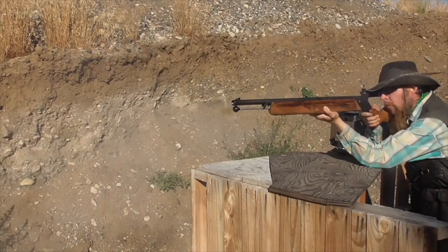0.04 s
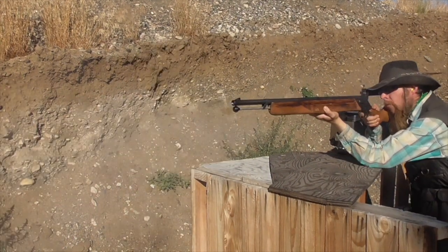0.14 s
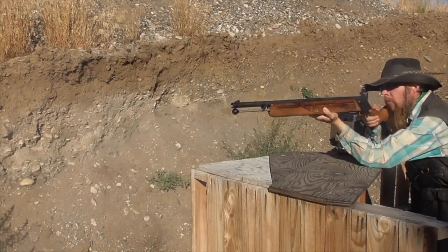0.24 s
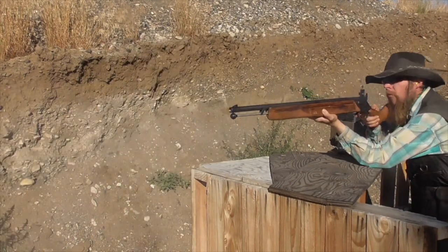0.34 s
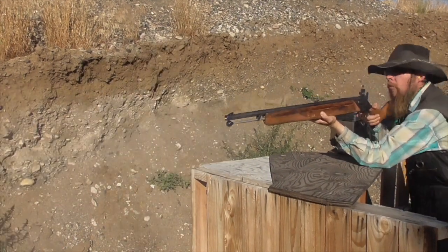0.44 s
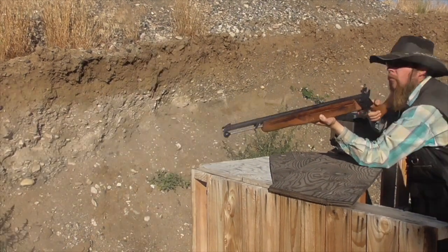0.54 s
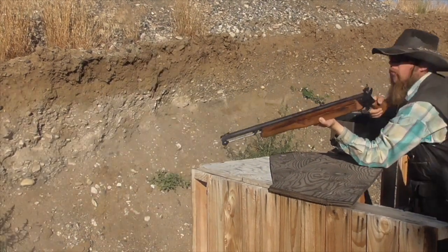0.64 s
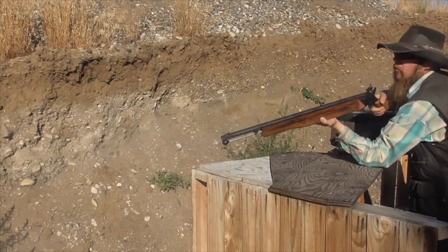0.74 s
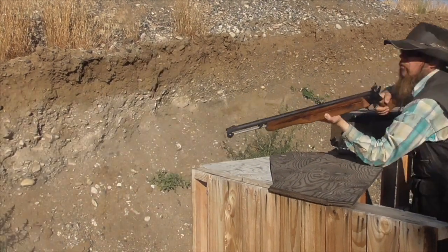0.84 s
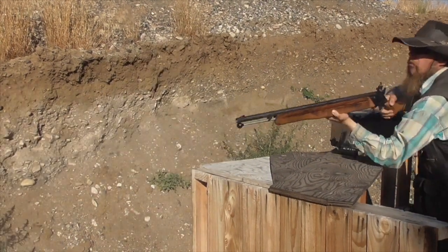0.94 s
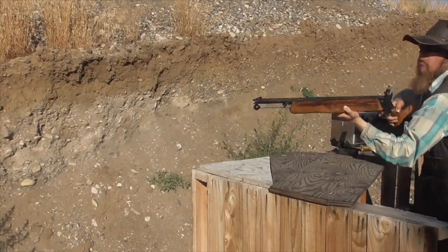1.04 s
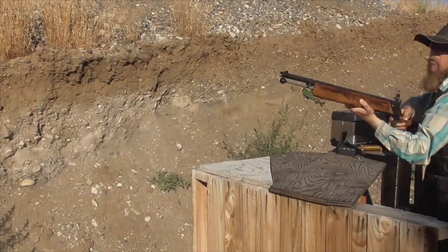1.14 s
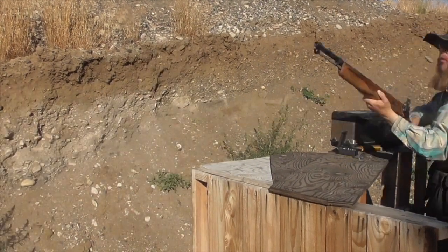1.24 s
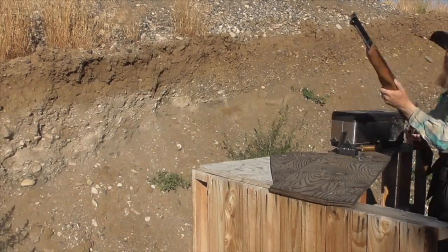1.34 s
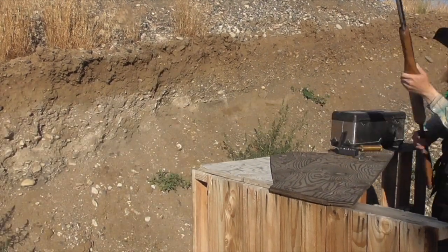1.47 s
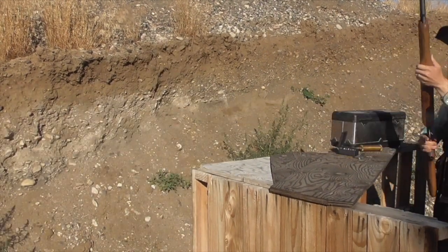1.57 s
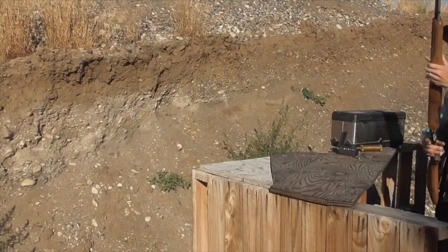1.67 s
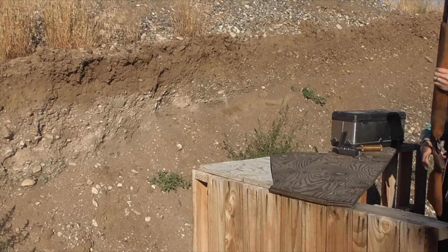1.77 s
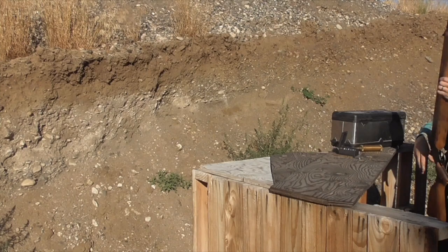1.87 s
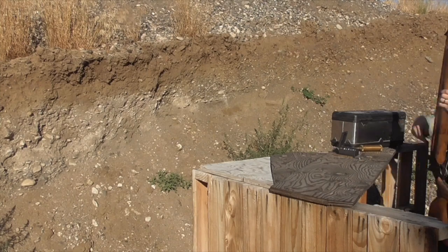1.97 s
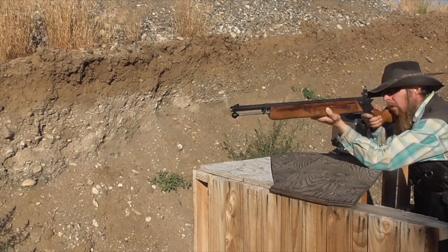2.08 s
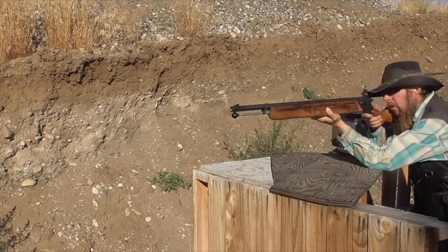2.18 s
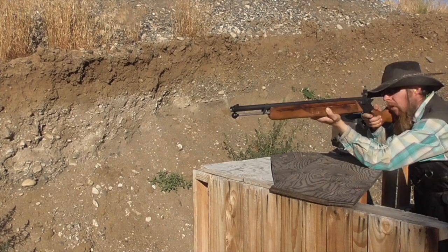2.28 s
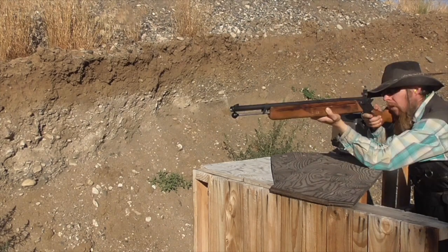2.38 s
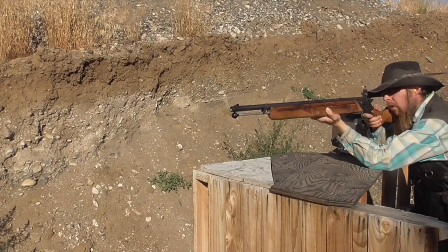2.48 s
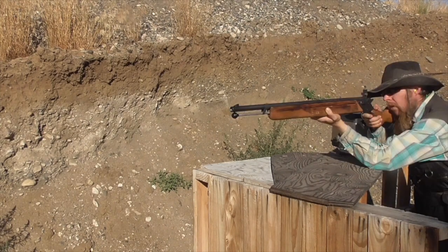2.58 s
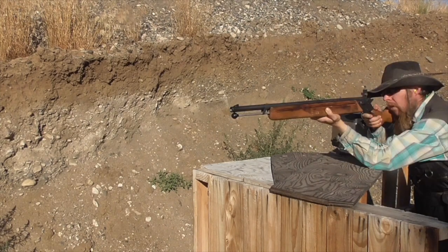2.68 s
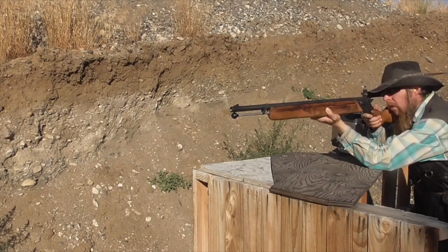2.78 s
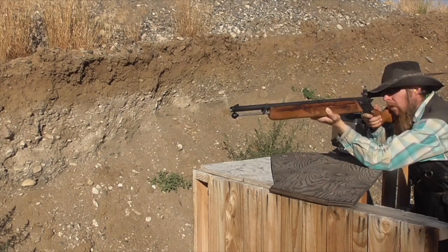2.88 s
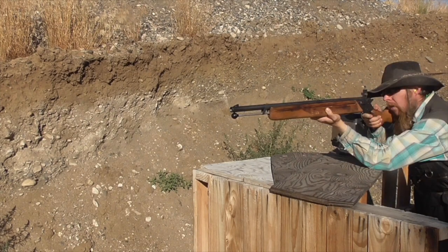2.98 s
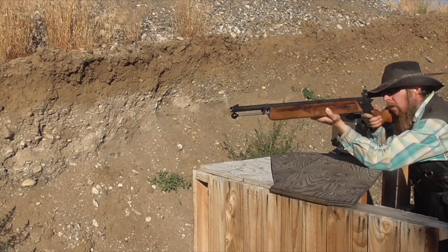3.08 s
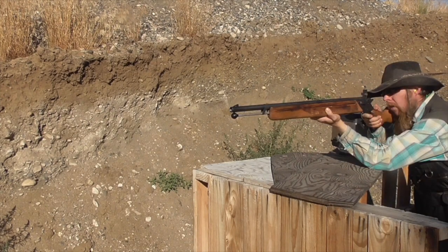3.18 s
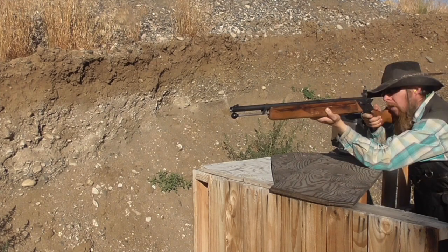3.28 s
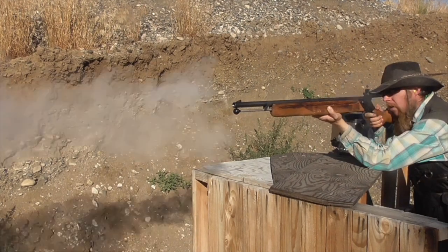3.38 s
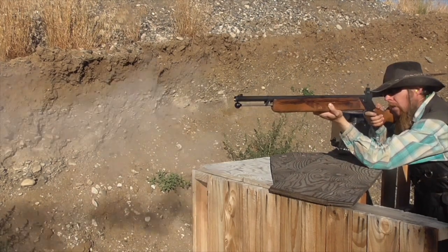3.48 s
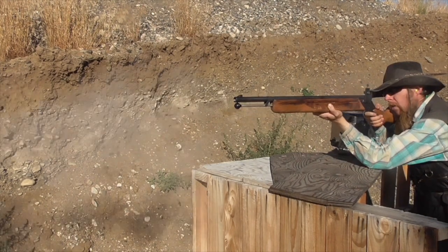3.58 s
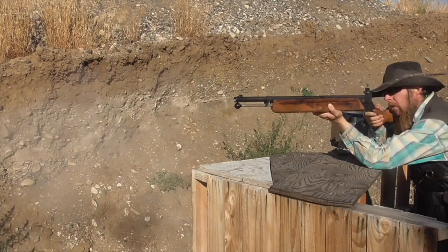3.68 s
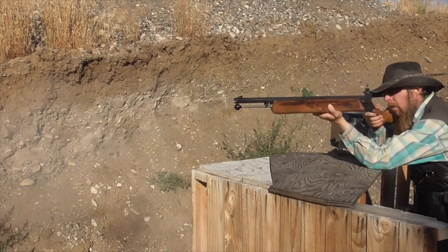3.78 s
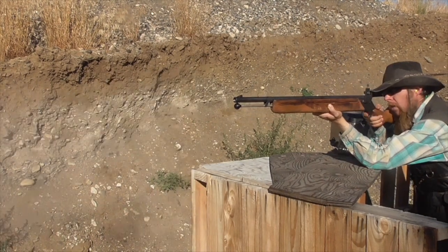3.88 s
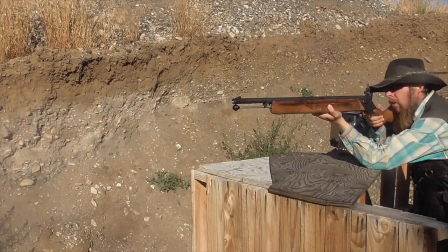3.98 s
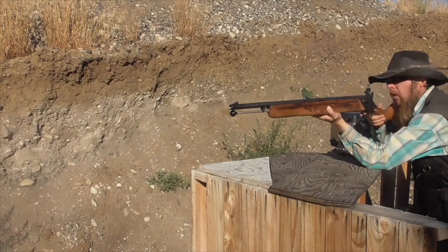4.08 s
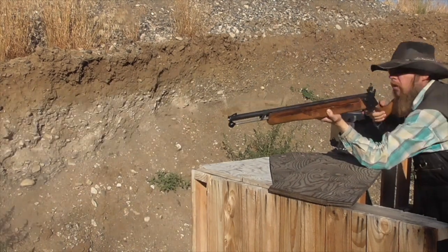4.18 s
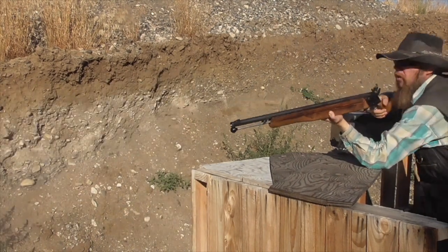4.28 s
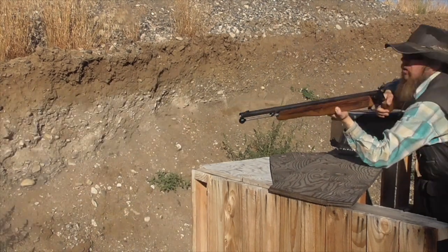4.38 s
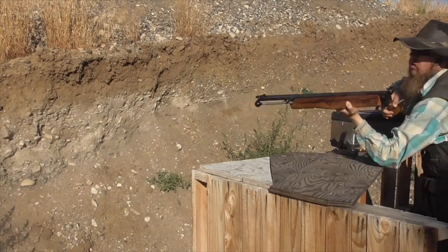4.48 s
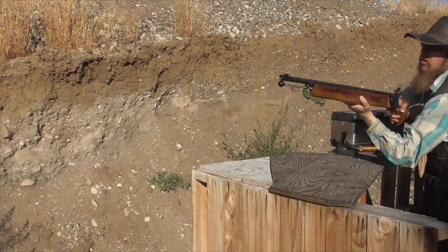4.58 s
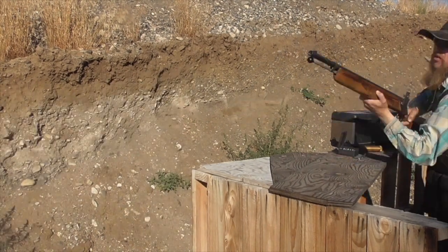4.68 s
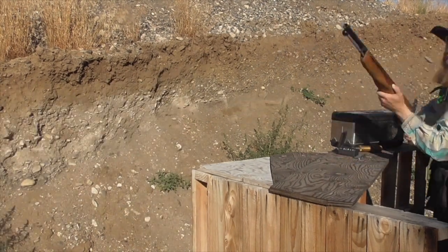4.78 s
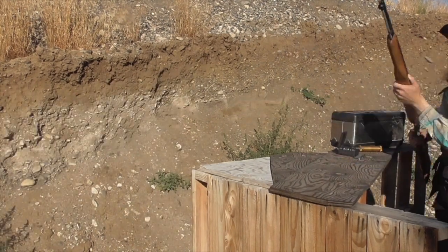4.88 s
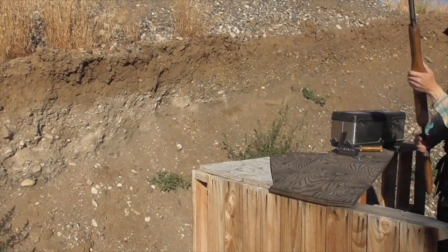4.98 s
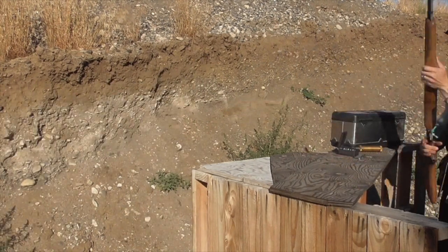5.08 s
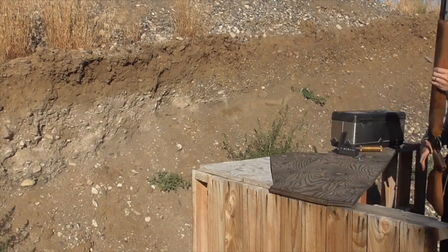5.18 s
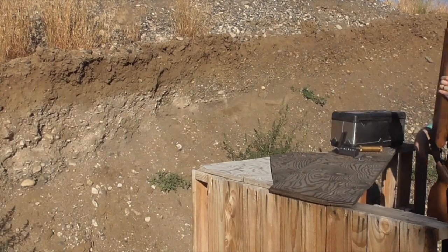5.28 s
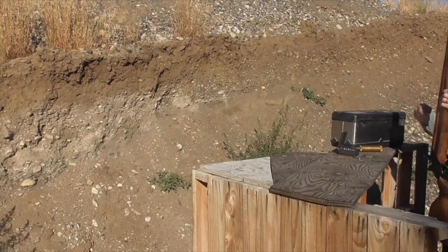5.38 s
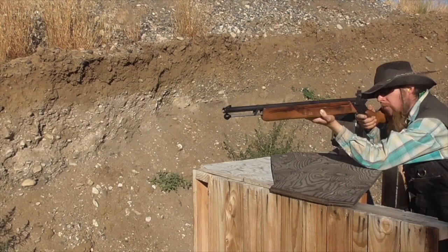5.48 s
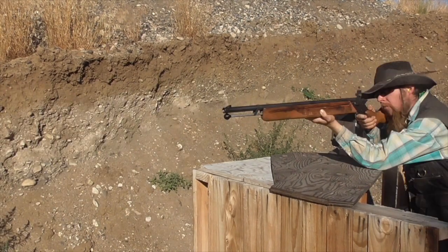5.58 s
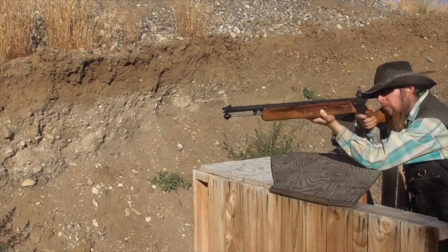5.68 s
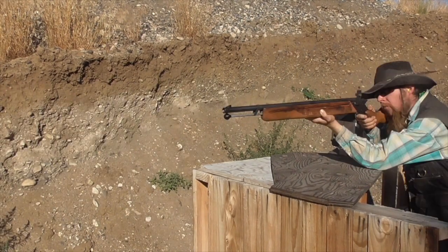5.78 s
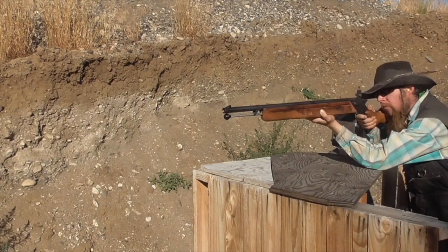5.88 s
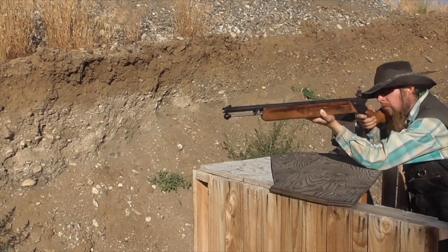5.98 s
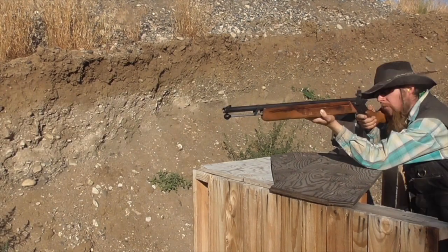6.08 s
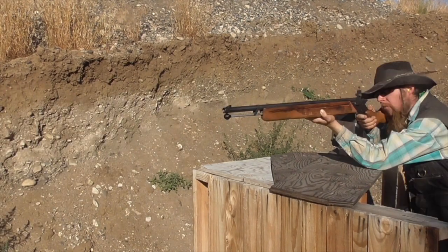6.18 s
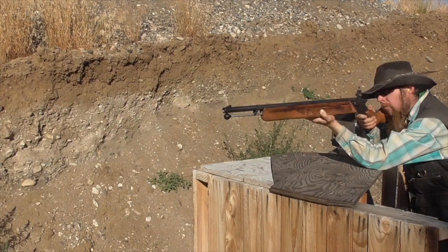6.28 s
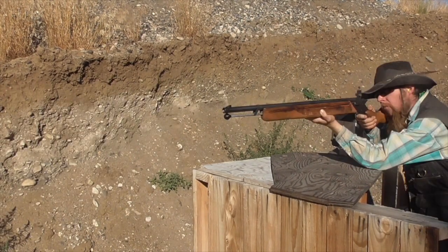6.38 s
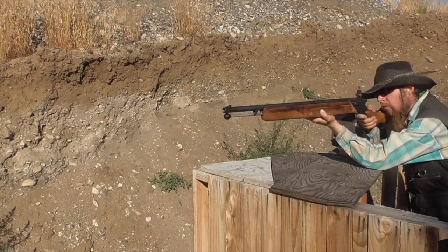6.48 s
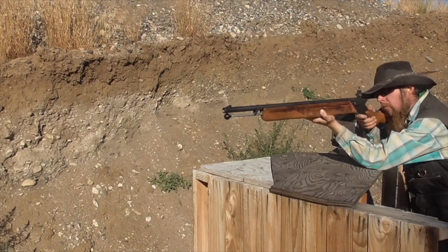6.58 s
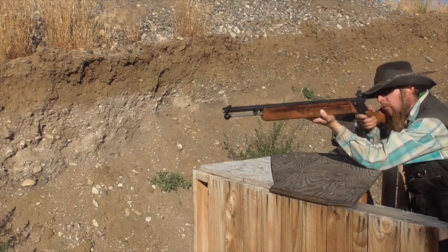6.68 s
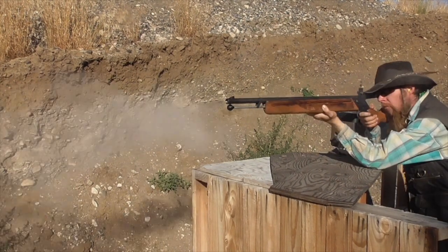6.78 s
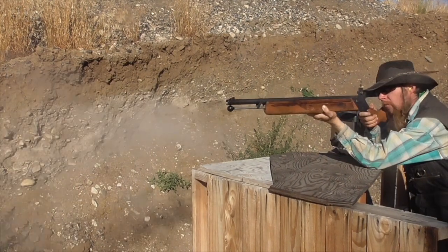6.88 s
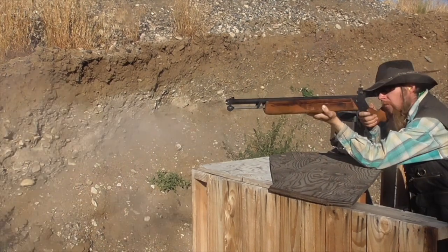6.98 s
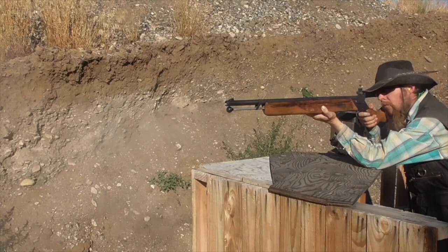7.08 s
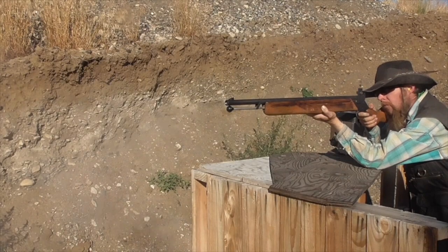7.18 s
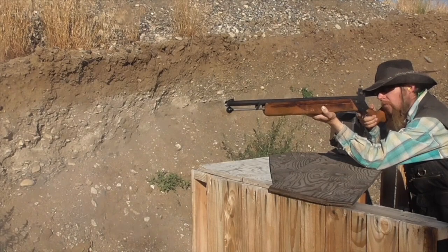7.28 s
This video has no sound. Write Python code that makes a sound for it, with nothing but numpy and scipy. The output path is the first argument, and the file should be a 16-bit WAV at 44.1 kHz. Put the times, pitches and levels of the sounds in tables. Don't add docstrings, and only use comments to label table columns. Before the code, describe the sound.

Close stereo camera microphone outdoors, with faint low wash, tiny whirr and chirping focus motor. First comes the tail of a gunshot, a thin whine, wooden knocks, clicks and scuffs. Then a sudden distorted rifle boom with bright hiss, a sharp slap from an earth bank, spraying dirt and soft hill rumble. Light handling follows before a second similar shot, its debris fainter and echo still rolling.

```python
import sys
import numpy as np
from scipy import signal
from scipy.io import wavfile
from scipy.ndimage import uniform_filter1d

SR = 44100
rng = np.random.default_rng(int(sys.argv[2]) if len(sys.argv) > 2 else 0)


def unload_wav(signal):
    wavfile.write(
        sys.argv[1],
        SR,
        np.round(np.clip(np.atleast_2d(signal).T, -1, 1) * 32767).astype(np.int16),
    )


def to_linear_factor(level_db):
    exponent = np.asarray(level_db, float) / 20
    return 10 ** exponent


N = 323694


def evened(x):
    return x / np.sqrt(np.mean(x ** 2) + 1e-20)


def read(points, hz):
    f, value = np.transpose(points)
    return np.interp(np.log(hz + 1), np.log(f + 1), value)


def follow(tables, column):
    t = np.arange(N) / SR
    return sum(to_linear_factor(np.interp(t, *np.transpose(rows)[[0, column]], -120, -120)) for rows in tables)


def swells(rows, fade, rise=0.0022, drop_db=40):
    tables = []
    for start, full, start_db, full_db in rows:
        tables.append([(start - rise, start_db - 10.0), (start, start_db),
                       (full, full_db), (full + drop_db / fade, full_db - drop_db)])
    return tables


def sides(db):
    return to_linear_factor(np.array([[.5], [-.5]]) * db)


def add(mix, s, sound):
    part = mix[:, max(round(s * SR), 0):][:, :sound.shape[1]]
    part += sound[:, :part.shape[1]]


def spurts(tables, make):
    out = np.zeros((2, N))
    for s, db in map(np.transpose, tables):
        t = np.arange(s[0], s[-1], 1 / SR)
        add(out, s[0], to_linear_factor(np.interp(t, s, db)) * make(len(t)))
    return out


def low_pass(x, hz, order=2):
    return signal.sosfilt(signal.butter(order, min(hz, 20000), fs=SR, output="sos"), x)


def thin_out(x, hz=110):
    return signal.sosfilt(signal.butter(2, hz, "high", fs=SR, output="sos"), x)


def resonate(x, hz, width_hz):
    r = np.exp(-np.pi * width_hz / SR)
    pole = r * np.exp(2j * np.pi * min(hz, 16000) / SR)
    return 2 * signal.lfilter([1 - r], [1, -pole], x).real


def resonances(x, rows):
    return sum(to_linear_factor(db) * evened(resonate(resonate(x, hz, width), hz, width)) for hz, width, db in rows)


def noise(count, spectrum, same, patchy_db, size=1024, pan=((1, 0), (2, 0))):
    frames, hz = 4 * count // size + 5, np.fft.rfftfreq(size, 1 / SR)
    a, b, c, d, patches = rng.standard_normal((frames, len(hz), 5)).T
    patches = uniform_filter1d(uniform_filter1d(patches, size=9, axis=0), size=9, axis=1)
    like = np.clip(read(same, hz), -1, 1)[:, None]
    left = a + 1j * b
    right = like * left + np.sqrt(1 - like ** 2) * (c + 1j * d)
    gain = to_linear_factor(read(spectrum, hz)[:, None] + patchy_db * evened(patches))
    z = np.array([left, right]) * gain * sides(read(pan, hz))[:, :, None]
    return evened(signal.istft(z, nperseg=size, noverlap=3 * size // 4)[1][:, :count])


def grainy(count, spectrum, flicker_db, size):
    flicker = evened(uniform_filter1d(rng.standard_normal(count), size=size))
    grains = noise(count, spectrum, [(100, 0.33), (9000, 0.42)], 1.3, size=256)
    return evened(to_linear_factor(flicker_db * flicker) * grains)


def lagged(sound, count=6):
    return np.array([np.pad(sound, (0, count)), np.pad(sound, (count, 0))])


def burst(db, hz, cycles):
    u = np.arange(0, cycles, hz / SR)
    return lagged(to_linear_factor(db) * np.sin(2 * np.pi * u) * np.sin(np.pi * u / cycles) ** 2)


def heave(t, db, length_s=0.02):
    swings = evened(thin_out(low_pass(rng.standard_normal(len(t)), 420), 90))
    envelope = np.tanh(np.maximum(t, 0) / 0.0018) * np.exp(-(t / length_s) ** 4)
    return np.array([[.85], [-1]]) * to_linear_factor(db) * swings * envelope


# (frequency [Hz], density [dB per Hz])
BOOM_SPECTRUM = [(24, -56.5), (40, -25.5), (114, -4), (331, 2), (511, -4), (832, -7), (1430, -7),
                 (1740, -25.5), (1940, -21), (3000, -29.5), (3900, -56), (6600, -120)]
# (frequency [Hz], density [dB per Hz])
HISS_SPECTRUM = [(880, -31.5), (1500, -3.5), (1760, -14.5), (1970, -5), (2500, -7), (4400, -3), (6300, -5),
                 (11700, -4.5), (14900, -13), (16000, -25.5), (16500, -45.5)]
# (frequency [Hz], correlation [-1..1])
BLAST_SAME = [(60, -0.26), (130, 0.33), (290, 0.074), (640, 0.25), (1410, 0.27), (3100, 0.34), (6820, .05),
              (15000, -0.082)]
HEAVE_DB, KICK_DB, KICK_S = 3, 1, 0.0054
BASS_LAG_S = .009


def blast(boom_db, hiss_db, fullest, swell_db, pan_db, lead=0.0085, hold=0.062):
    t = np.arange(-lead, .25, 1 / SR)
    after, late = np.maximum(t, 0), np.maximum(t - hold, 0)
    rise_db = 3200 * np.minimum(t, 0) - 16 * np.tanh(np.maximum(-t, 0) / .0006)
    push = heave(t, boom_db + HEAVE_DB)
    swell_db = swell_db * np.exp(-((t - fullest) / 0.029) ** 2)
    boom_db = boom_db + rise_db + swell_db - 60 * after - 11 * np.tanh(late / 0.0019) - 160 * late
    kick_db = KICK_DB * np.exp(-after / KICK_S)
    hiss_db = hiss_db + rise_db + kick_db - 170 * after - 5 * np.tanh(late / 0.049) - 260 * late
    boom = to_linear_factor(boom_db) * noise(len(t), BOOM_SPECTRUM, BLAST_SAME, 1.1, size=512)
    boom = boom - low_pass(boom, 400) * np.exp(-(after / BASS_LAG_S) ** 2)
    hiss = to_linear_factor(hiss_db) * noise(len(t), HISS_SPECTRUM, BLAST_SAME, 1.1, size=256)
    dull = low_pass(hiss, 14000, order=8)
    top = (hiss - dull) * np.exp(-(after / 0.07) ** 4)
    return sides(pan_db) * (boom + push + dull + top)


def ground_wave(db, start_hz=1140, end_hz=290, bend_s=.0013):
    t = np.arange(0, .012, 1 / SR)
    hz = end_hz + (start_hz - end_hz) * np.exp(-(t / bend_s) ** 2)
    swell = np.tanh(t / .0009) * np.exp(-t / .0036 - (t / .007) ** 4)
    return to_linear_factor(db) * lagged(swell * np.sin(2 * np.pi * np.cumsum(hz) / SR))


def shock(u):
    return (u > 0) * (1.2 * u - 1) * np.exp(-.8 * abs(u))


# (frequency [Hz], density [dB per Hz])
SCATTER_SPECTRUM = [(110, -35), (290, -2.5), (490, -2.5), (1120, -0.5), (1580, -12), (2850, -5.5),
                    (8000, -14), (12600, -16.5), (13200, -60.5)]


def slap(crack_db, scatter_db, step=.00105):
    t = np.arange(0, .12, 1 / SR)
    faces = shock(t / .00028) + .6 * shock((t - step) / .0002) + .2 * shock((t - 2 * step) / .0002)
    grit = .24 * thin_out(rng.standard_normal(len(t)), 7000) * to_linear_factor(-14000 * np.maximum(t - step, 0))
    ringing = 0.8 * resonate(faces, 2300, 1000) + 1.1 * resonate(faces, 3700, 1400)
    crack = low_pass(low_pass(faces, 5000, order=1) + ringing + grit, 15800)
    crack = to_linear_factor(crack_db) * lagged(thin_out(crack, 300))[:, :len(t)]
    tail_db = scatter_db - 60 * t - 900 * np.maximum(t - .043, 0)
    return crack + to_linear_factor(tail_db) * noise(len(t), SCATTER_SPECTRUM, [(100, 0.41), (9000, .1)], 1.8, size=256)


# (time [s], boom [dB], hiss [dB], swell [dB], left-right [dB])
SHOTS = [
    (3.473, -16.5, -12.5, -0.5, 0.44),
    (6.811, -17, -13, 1.5, 0.5),
]
BANK_DELAYS = [
    .1101,
    .1114,
]
# (centre after shot [s], beside the boom [dB], frequency [Hz], length [cycles])
NEAR_ECHOES = [(.003, 3.5, 1290, 7), (.003, 0, 806.4, 5), (.011, 1.5, 1301, 6), (.017, 2.5, 800, 7),
               (0.0195, 5, 429.7, 3), (0.023, 9, 310.6, 2), (0.034, 6.5, 500, 3), (.042, 5.5, 330, 3),
               (.048, -3.5, 797.7, 8), (.056, 2, 1250, 11), (.0577, 3, 350, 2)]
# (time [s], peak [dB], frequency [Hz], left-right [dB])
BUFFETS = [
    (3.482, -12, 160, 22),
    (6.8215, -12, 165, -22),
]
MOUND_S, BANK_WAVE_S = .0564, .1188
MOUND_DB, CRACK_DB, BANK_WAVE_DB, SCATTER_DB = 5.5, 13.5, 6, -19.5


def shots():
    out = np.zeros((2, N))
    for (s, boom_db, hiss_db, swell_db, pan_db), bank in zip(SHOTS, BANK_DELAYS):
        add(out, s - .008, blast(boom_db, hiss_db, 0.11, swell_db, pan_db))
        for centre, db, hz, cycles in NEAR_ECHOES:
            add(out, s + centre - cycles / hz / 2, burst(boom_db + db, hz, cycles))
        add(out, s + MOUND_S, ground_wave(boom_db + MOUND_DB))
        add(out, s + bank, slap(boom_db + CRACK_DB, boom_db + SCATTER_DB))
        add(out, s + BANK_WAVE_S, ground_wave(boom_db + BANK_WAVE_DB))
    for s, db, hz, pan_db in BUFFETS:
        one_sided = sides(pan_db) / to_linear_factor(abs(pan_db) / 2)
        add(out, s, one_sided * burst(db, hz, 3.5))
    return out


# (time [s], thuds [dB], roll [dB])
HEARD_SHOTS = [
    (-.357, -4, -49.5),
    (3.473, -4, -44),
    (6.811, -5, -48.5),
]


def after_shots(delay, gain_db, fade, rise):
    rows = []
    for s, _, db in HEARD_SHOTS:
        rows.append((s + delay, s + delay + 0.0098, db + gain_db, db + gain_db))
    return follow(swells(rows, fade, rise), column=1)


# (frequency [Hz], density [dB per Hz])
ROLL_SPECTRUM = [(24, -63.5), (40, -28), (66, -22), (102, -15), (155, -3.5), (279, -2), (609, -28),
                 (866, -27), (900, -20), (1170, -45.5), (1980, -120)]
# (delay [s], peak [dB], frequency [Hz])
HILLS = [(.241, -30.5, 255), (.27, -39, 270), (.345, -36.5, 233), (.364, -35.5, 250), (.378, -35.5, 168),
         (.402, -44.5, 320), (.435, -34, 160), (0.46, -40, 248), (.545, -35, 235), (0.562, -40.5, 204),
         (0.603, -40, 146), (0.617, -42, 148), (0.641, -44, 201)]
# (time [s], peak [dB], frequency [Hz])
THUDS = [(0.32, -34.5, 229), (0.37, -47, 180), (0.511, -45, 204), (0.706, -51.5, 109), (0.764, -52, 180),
         (1.128, -48, 196), (1.965, -51, 332), (1.981, -50, 310), (1.95, -55, 400), (2.003, -50.5, 450),
         (2.022, -54, 520), (5.515, -53, 515), (3.6987, -31, 336), (3.709, -37, 222), (3.721, -41, 248),
         (3.828, -35.5, 810), (4.712, -53, 250), (7.019, -44, 288), (7.055, -42.5, 230),
         (7.099, -41.5, 265)]
ROLL_S, ROLL_RISE_S, ROLL_FADE_DB_PER_S = 0.191, 0.037, 30.3


def hills():
    roll_gain = after_shots(ROLL_S, 0, ROLL_FADE_DB_PER_S, ROLL_RISE_S)
    out = roll_gain * noise(N, ROLL_SPECTRUM, [(60, .1), (600, 0.48)], 1.3)
    echoes = []
    for s, shot_db, _ in HEARD_SHOTS:
        echoes += [(s + delay - .003, db + shot_db, hz) for delay, db, hz in HILLS if 0 < s + delay < N / SR]
    for s, db, hz in echoes + THUDS:
        add(out, s, burst(db + 2.5, hz, 2.27))
    return out


def strikes(rows, t60, sharpness, rise, top, gain_db):
    out, t = np.zeros((2, N)), np.arange(3000) / SR
    for (s, db, hz, pan_db), grit in zip(rows, rng.standard_normal((len(rows), 2, len(t)))):
        blow = (grit + 0.35 * grit[::-1]) * to_linear_factor(-60 * t / max(t60, .001)) * np.tanh(t / rise)
        ring = resonate(resonate(blow, hz, hz / sharpness), 1.08 * hz, 1.6 * hz / sharpness)
        ring = low_pass(ring - low_pass(ring, 0.16 * hz), top * hz)
        add(out, s, to_linear_factor(db + gain_db) * sides(pan_db) * ring / abs(ring).max())
    return out


# (time [s], peak [dB], frequency [Hz], left-right [dB])
KNOCKS = [(.315, -33, 700, 4), (0.3195, -27, 563, -1), (0.325, -36.5, 420, -8), (0.361, -45, 503, -4),
          (0.492, -47, 520, 1.5), (0.747, -42, 740, 3.5), (0.753, -49, 590, -7), (0.762, -47.5, 463, 2),
          (0.929, -52.5, 517, 2), (1.122, -45, 503, -4), (1.132, -46.5, 386, -5), (1.265, -54.5, 460, -8),
          (1.379, -57, 482, -17), (4.705, -46, 390, -6), (4.966, -48.5, 440, -2)]
# (time [s], peak [dB], frequency [Hz], left-right [dB])
CLACKS = [
    (1.8112, -43, 1500, -4),
    (1.821, -49, 1210, 0),
    (3.6995, -31, 1190, 2),
    (3.7395, -24, 950, 5),
    (7.09, -55, 900, 4),
    (5.238, -37.5, 1040, -6.5),
    (5.246, -41, 885, 0),
    (5.514, -36.5, 1050, -0.5),
    (5.522, -39, 770, -2),
]


def knocks():
    wood = low_pass(strikes(KNOCKS, 0.066, 1.3, 0.001, 1.36, 0.97), 1230, order=4)
    return wood + strikes(CLACKS, 0.032, 0.91, 0.00015, 1.33, 0.48)


# (time [s], peak [dB], frequency [Hz], left-right [dB])
TICKS = [(0.0842, -53.5, 9980, 17), (0.2873, -42, 7950, -2), (.365, -51, 6500, 0), (0.7328, -50, 8540, 0),
         (0.817, -46, 6600, 1), (1.1179, -41, 11200, -5.5), (1.1897, -47, 11500, 15),
         (1.196, -48, 11000, 0), (1.2662, -38, 10400, 0), (1.2695, -44.5, 4800, -2), (1.278, -47, 9500, 0),
         (1.5216, -45, 5060, -5), (1.8108, -43.5, 8100, 2), (1.9098, -36, 7500, -2), (1.932, -43, 6680, -7),
         (1.9454, -44, 7860, 0), (1.9796, -42, 5900, -4), (2.012, -44.5, 6900, 0), (2.068, -58, 7000, 0),
         (2.095, -50.5, 9500, 0), (3.7405, -38.5, 8500, 12), (3.7684, -39, 4150, 6),
         (3.7688, -33.5, 9300, 10), (4.201, -36.5, 10700, -4), (4.2137, -45, 10670, -4),
         (4.4116, -47.5, 9000, -4), (4.708, -54, 6500, -4), (4.792, -56, 4500, 0), (4.8035, -45, 9000, 2),
         (5.339, -47, 10500, -4), (4.7554, -45, 8200, 0), (4.799, -31.5, 9400, 4),
         (5.2372, -39, 5000, -0.5), (5.3358, -36.5, 11200, -6), (5.3597, -34, 6550, -1),
         (5.457, -40.5, 10500, -5), (5.4764, -50, 9000, 0), (5.513, -33, 5940, 1)]
# (time [s], peak [dB], frequency [Hz], left-right [dB])
SCUFFS = [(0.262, -54.5, 6760, 15.5), (0.4964, -54.5, 3400, 0), (0.6299, -68, 3780, 0),
          (0.7994, -56, 4840, 0.5), (1.128, -44.5, 5800, 0), (1.2665, -45, 4900, 0), (1.3694, -59, 5250, 0),
          (1.5195, -46, 5550, 0), (1.6194, -49, 4970, -2), (3.7, -50.5, 3600, 22), (3.749, -47, 1250, 5),
          (4.1037, -58.5, 3680, -6.5), (4.7162, -46, 5470, -1), (4.8, -47, 8000, 1), (7.105, -64, 3400, 11)]
# (time [s], peak [dB], frequency [Hz], left-right
# [dB])
PINGS = [(3.7403, -34, 4200, 12), (3.7635, -33.5, 4000, 14), (3.7675, -33, 7230, 13),
         (3.803, -42.5, 3800, 0), (7.0812, -54, 4250, 9), (7.085, -57, 3900, 9), (7.0905, -57, 4300, 9),
         (7.0403, -66, 3000, 4), (7.119, -62, 4250, 8), (7.13, -62, 4250, 8), (7.186, -63, 3800, 3),
         (7.2194, -66, 4400, 3), (7.098, -63, 3300, 6), (5.459, -51, 5900, 6), (1.931, -42, 6500, 4),
         (4.4125, -52, 13500, -4)]


def small_strikes():
    ticks = thin_out(strikes(TICKS, 0.0061, 2.3, .0001, 1.4, 1.3), 2800)
    scuffs = strikes(SCUFFS, 0.1, 1.47, 0.0011, 3.3, -1.1)
    return ticks + scuffs + strikes(PINGS, 0.023, 7, 0.00035, 1.5, 0.1)


# (start [s], length [s], first pitch [Hz], final pitch [Hz], level [dB], fade
# [dB/s])
WHINES = [
    (0, 1.3, 918, 1005, -62, 8),
    (7.06, .3, 1700, 1450, -76, 4),
    (7.1, .24, 2460, 2300, -84, -45),
    (7.19, .11, 3290, 3100, -84, -5),
]
# (frequency ratio, level [dB])
WHINE_PARTIALS = [(1, 0), (1.237, -12), (1.515, -9)]
GLIDE_S, PASS_S, PASS_DB = .8, .27, 6.5


def whine(start, length, first_hz, final_hz, db, fade, partials):
    t = np.arange(0, length, 1 / SR)
    waver = evened(uniform_filter1d(rng.standard_normal(len(t)), size=1500))
    hz = final_hz + (first_hz - final_hz) * np.exp(-t / GLIDE_S)
    turns = np.cumsum(hz * (1 + 0.0017 * waver)) / SR
    tones = sum(to_linear_factor(part_db) * np.sin(2 * np.pi * k * turns) for k, part_db in partials)
    level_db = db - fade * t - PASS_DB * np.tanh((t / PASS_S) ** 4)
    gain = np.sqrt(2) * to_linear_factor(level_db) * np.tanh(t / 0.014) * to_linear_factor(1.6 * waver)
    return start, gain * tones * sides(0)


def gliding_tones():
    out = np.zeros((2, N))
    add(out, *whine(*WHINES[0], WHINE_PARTIALS))
    for row in WHINES[1:]:
        add(out, *whine(*row, WHINE_PARTIALS[:1]))
    return out


# (time [s], level [dB])
MOVES = [
    [(0, -75.5), (.466, -66.5), (1.0, -68.5), (1.4, -65.5), (1.85, -73), (2.05, -71.5), (2.2, -84)],
    [(3.62, -64), (3.652, -60.5), (3.936, -74), (4.374, -67.5), (4.62, -69.5), (4.758, -66.5),
     (5.14, -65.5), (5.538, -73.5), (5.7, -104)],
    [(6.96, -74), (7.12, -76.5), (7.34, -70.5)],
]
# (frequency [Hz], density [dB per Hz])
RUSTLE_SPECTRUM = [(1500, -34), (2500, -6), (4900, -3), (10600, -5), (14200, -8), (15600, -13),
                   (15800, -59.5)]
# (frequency [Hz], density [dB per Hz])
SCRAPE_SPECTRUM = [(88, -26.5), (150, -4), (270, -3), (347, -4.5), (878, -7.5), (1450, -10.5),
                   (1690, -17.5), (3000, -26.5), (3900, -40), (6600, -120)]
# (start [s], fullest [s], start level [dB], fullest level [dB])
RUBS = [
    (1.908, 1.98, -68.5, -54),
    (5.334, 5.476, -64, -61.5),
]
# (frequency [Hz], density [dB per Hz])
RUB_SPECTRUM = [(1500, -30), (2500, -16), (4000, -15.5), (5000, -3), (8000, -2), (12000, -5.5),
                (13200, -13), (15000, -48)]
# (start [s], fullest [s], start level [dB], fullest level [dB])
DIRT = [
    (3.69, 3.745, -65, -51),
    (3.748, 3.768, -49.5, -40.5),
    (3.79, 3.815, -55, -56.5),
    (7.09, 7.13, -68, -71),
]
# (frequency [Hz], density [dB per Hz])
SPRAY_SPECTRUM = [(180, -39), (300, -5), (814, -0.5), (975, 4.5), (1290, -2), (1620, -13), (4050, -10),
                  (6000, -17.5), (7300, -15.5), (15000, -22.5)]
# (frequency [Hz], correlation [-1..1])
AIR_SAME = [(60, 0.3), (150, 0.45), (380, -0.31), (950, -0.4), (2380, 0.041), (5980, -0.12),
            (15000, 0.0097)]
SCRAPE_DB, RUB_SCRAPE_DB, HAZE_DB = 4, -1, -58.5
RUB_FADE_DB_PER_S, DIRT_FADE_DB_PER_S, HAZE_FADE_DB_PER_S = 265, 450, 12.3


def moves():
    effort, rubbing = follow(MOVES, column=1), swells(RUBS, RUB_FADE_DB_PER_S)
    rustle = effort * grainy(N, RUSTLE_SPECTRUM, 2.2, size=130)
    rubs = spurts(rubbing, lambda count: grainy(count, RUB_SPECTRUM, 2.7, size=60))
    haze = after_shots(0.183, HAZE_DB + 43.5, HAZE_FADE_DB_PER_S, .03)
    scrape_gain = to_linear_factor(SCRAPE_DB) * effort + to_linear_factor(RUB_SCRAPE_DB) * follow(rubbing, column=1) + haze
    scrape = scrape_gain * noise(N, SCRAPE_SPECTRUM, AIR_SAME, 1.0)
    dirt = spurts(swells(DIRT, DIRT_FADE_DB_PER_S), lambda count: grainy(count, SPRAY_SPECTRUM, 2.8, size=90))
    return rustle + to_linear_factor(4.0) * rubs + scrape + low_pass(to_linear_factor(4.0) * dirt, 12600, order=3)


# (start [s], end [s], start level [dB], end level [dB])
MOTOR_RUNS = [
    (0, .15, -75.5, -82),
    (.15, .254, -83, -73),
    (.49, .83, -72.5, -72.5),
    (.27, .48, -89, -80),
    (.87, .94, -82, -81),
    (3.88, 3.99, -76.5, -77),
    (7.16, 7.34, -80, -74),
]
# (frequency [Hz], width [Hz], level [dB])
LENS_BARREL = [(1480, 160, 3), (2380, 90, 0), (3250, 110, -10), (3900, 300, -10)]
FRAME_HZ = 59.94
STEP_HZ, STEP_DROP_HZ, STEP_S = 2290, 400, .004


def focus_motor():
    turns = np.arange(N) * FRAME_HZ / SR + 0.45
    since = turns % 1 / FRAME_HZ
    uneven = to_linear_factor(1.6 * rng.standard_normal(int(turns[-1]) + 1))[turns.astype(int)]
    pitch = STEP_HZ + STEP_DROP_HZ * np.exp(-since / .003)
    ring = since * np.exp(-since / STEP_S * 1.5)
    steps = uneven * ring * np.sin(2 * np.pi * np.cumsum(pitch) / SR)
    rasp = (0.22 + np.exp(-since / .002)) * rng.standard_normal(N)
    chirr = sum(to_linear_factor(db) * evened(resonate(resonate(rasp, hz, width), hz, 400)) for hz, width, db in LENS_BARREL)
    return follow(swells(MOTOR_RUNS, 450, .015), column=1) * (.55 * chirr + .72 * evened(steps))


def frame_ticks():
    ticks, at = np.zeros(N + 8), np.arange(.004, N / SR - .001, 1 / FRAME_HZ) * SR
    near = at.astype(int)[:, None] + np.arange(8)
    sign = (-1.) ** np.arange(len(at))[:, None]
    np.add.at(ticks, near, np.sinc(near - at[:, None] - 3) * sign)
    return ticks[:N]


# (frequency [Hz], width [Hz], level [dB])
WHIRR = [(10370, 300, -81.5), (11600, 900, -89.5), (9000, 1700, -92), (4500, 2000, -94.5)]
# (frequency [Hz], width [Hz], level [dB])
HOUSING = [(960, 210, -79.5), (1500, 96, -83.5), (1990, 78, -88), (2420, 69, -89.5)]
# (frequency [Hz], level [dB])
CAMERA_TONES = [(899, -89.5), (1545, -94), (1836, -99), (2056, -98), (2385, -101)]


def camera():
    t = np.arange(N) / SR
    whirr = resonances(frame_ticks(), WHIRR)
    tones = sum(np.sqrt(2) * to_linear_factor(db) * np.sin(2 * np.pi * hz * t) for hz, db in CAMERA_TONES)
    return whirr + tones + resonances(rng.standard_normal((2, N)), HOUSING)


# (frequency [Hz], density [dB per Hz])
AIR_SPECTRUM = [(20, -29), (65, -2.5), (130, -8.5), (200, -9), (300, -12.5), (500, -15), (900, -19),
                (1600, -28.5), (3050, -33.5), (4600, -33), (6200, -34.5), (9500, -27.5), (14500, -30.5),
                (15650, -35), (15800, -68.5)]
# (frequency [Hz], left-right [dB])
AIR_PAN = [(60, -1.5), (240, -1), (950, -0.5), (3770, 0), (15000, -1.5)]
# (start [s], fullest [s], start level [dB], fullest level [dB])
DRONE = [
    (2.3, 3.0, -76, -64.5),
]
# (frequency [Hz], density [dB per Hz])
DRONE_SPECTRUM = [(88, -46), (150, -16), (275, -1), (386, -17), (416, -8), (448, -14), (900, -21),
                  (1170, -48.5), (1980, -120)]
AIR_DB = -65
DUCK_DB, DUCK_S = 7.5, 0.44


def air():
    t = np.arange(N) / SR
    wash = to_linear_factor(AIR_DB + 3) * noise(N, AIR_SPECTRUM, AIR_SAME, .9, size=2048, pan=AIR_PAN)
    drone = spurts(swells(DRONE, 12, 0.067, 6.7),
                   lambda count: noise(count, DRONE_SPECTRUM, AIR_SAME, 2.0, size=2048))
    duck_db = sum(DUCK_DB * (t > s) * np.exp(-((t - s) / DUCK_S) ** 2) for s, *_ in SHOTS)
    return (wash + camera() + drone) * to_linear_factor(-duck_db)


def scene():
    rifle = shots() + thin_out(hills())
    handling = knocks() + small_strikes() + moves()
    return rifle + handling + gliding_tones() + focus_motor() + air()


TOP_HZ, TOP_GATE_DB = 13600, -23


def gate_top(x):
    body = signal.oaconvolve(x, signal.firwin(255, TOP_HZ, fs=SR)[None], "same")
    top, bright = x - body, np.diff(body, prepend=0)
    top_power, bright_power = (uniform_filter1d((v ** 2).sum(0), size=1024) for v in (top, bright))
    keep = top_power > to_linear_factor(2 * TOP_GATE_DB) * bright_power
    return body + top * uniform_filter1d(keep * 1., size=256)


def roll_off(x):
    return signal.sosfilt(signal.butter(12, 16630, fs=SR, output="sos"), x)


LOW_CUT_HZ, EDGE_HZ = 76, 16450


def record(dry):
    cut = signal.sosfilt(signal.butter(1, LOW_CUT_HZ, "high", fs=SR, output="sos"), dry)
    loud = gate_top(np.tanh(cut / 1.072) * 1.094)
    edge = signal.firwin(255, EDGE_HZ, window=("kaiser", 9), fs=SR)
    return roll_off(signal.oaconvolve(loud, edge[None], "same"))


dry = scene()
out = record(dry)
unload_wav(out)
```